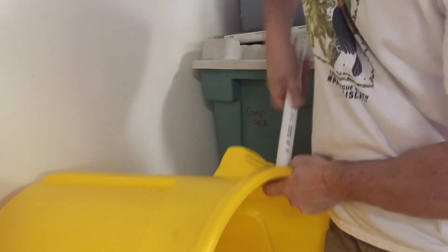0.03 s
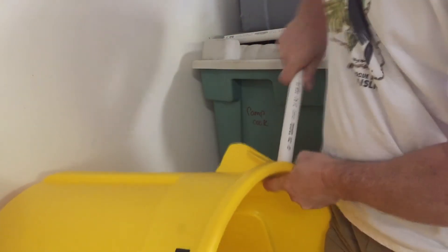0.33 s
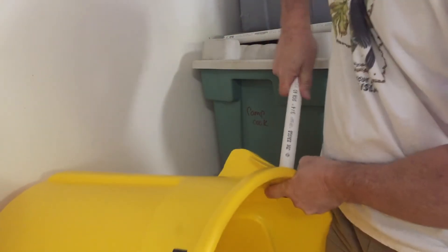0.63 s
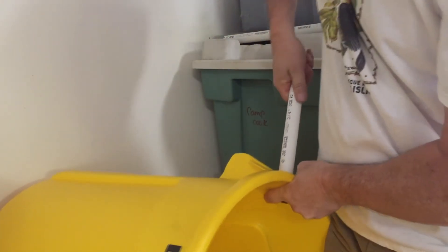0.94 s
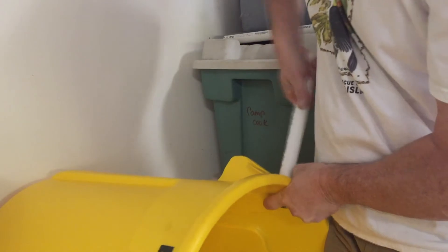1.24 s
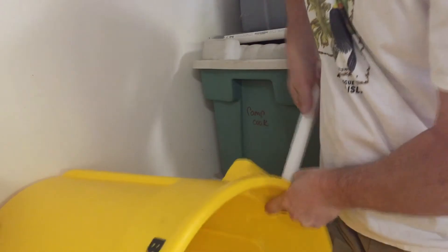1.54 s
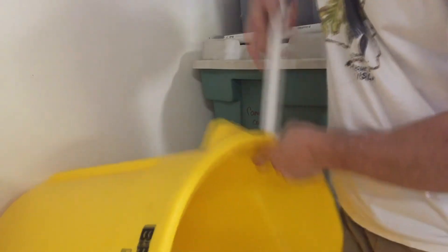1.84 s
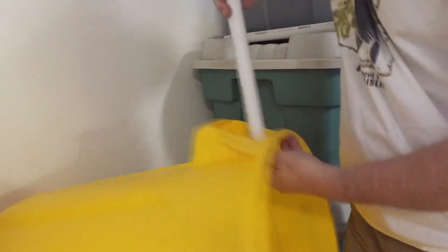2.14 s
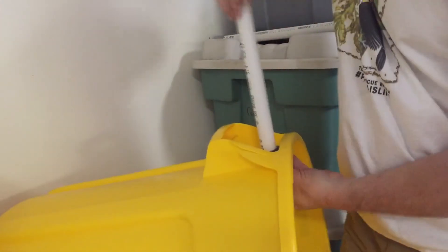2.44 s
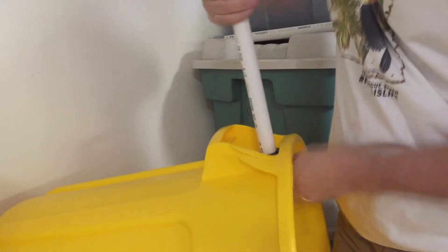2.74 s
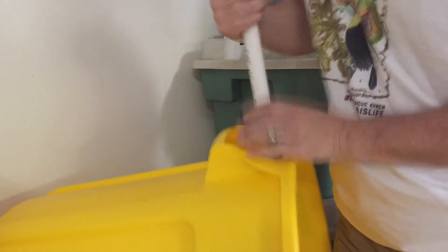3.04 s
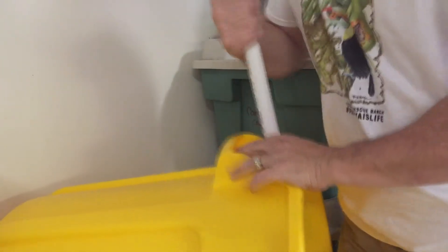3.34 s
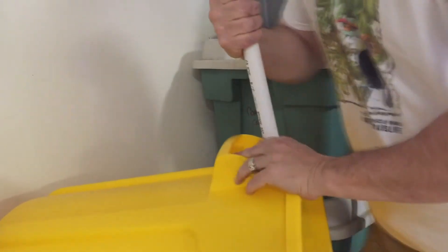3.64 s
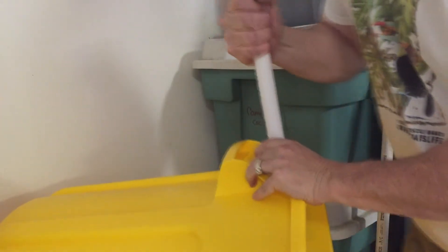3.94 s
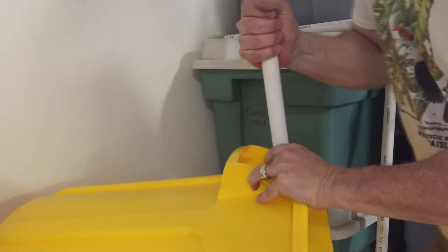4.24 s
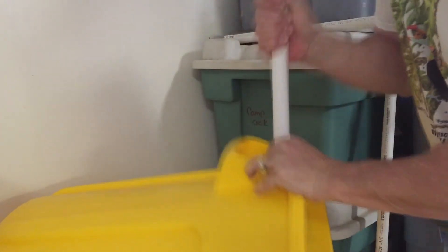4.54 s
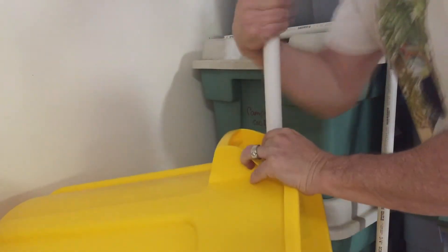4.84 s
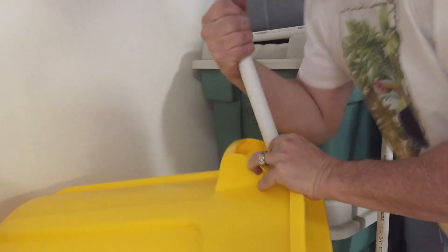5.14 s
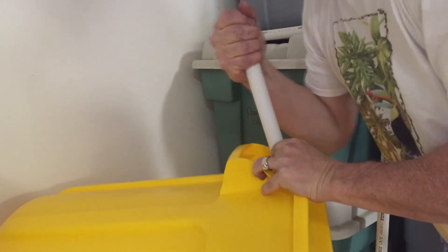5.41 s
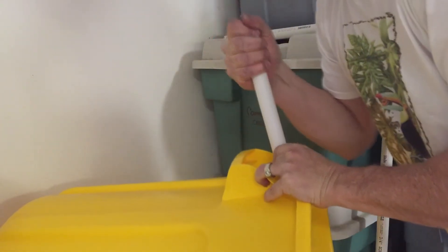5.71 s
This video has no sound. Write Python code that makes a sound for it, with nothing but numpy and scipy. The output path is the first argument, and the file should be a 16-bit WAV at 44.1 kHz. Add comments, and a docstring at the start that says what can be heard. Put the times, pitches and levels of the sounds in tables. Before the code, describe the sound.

A plastic pipe taps and scrapes lightly around a hole in a big plastic bin, with a few dull bumps and a low rumble. The bin is turned over with a brief grinding groan. Then the pipe rubs and jerks through a rubber seal, making loud hollow thumps, ticks and tiny squeaks, and ends with a few thin creaking knocks. The sounds are close, in a small quiet room.

```python
"""In a small room, a plastic pipe is worked through a rubber seal in the wall of a big plastic bin. The pipe
end taps and scrapes round the hole, exciting bending modes of pipe and wall. The bin is turned over with a
grinding groan; then the pipe jerks through the seal by stick-slip, and each jerk thumps the hollow bin. Hands
hiss over the plastic by friction, sharp ticks mark some taps and releases, and the rubber squeaks."""
import sys
import numpy as np
from scipy import signal
from scipy.fft import rfft, irfft, next_fast_len
from scipy.io import wavfile

SR = 44100
rng = np.random.default_rng(int(sys.argv[2]) if len(sys.argv) > 2 else 0)


def master(y):
    """Save y as 16-bit WAV."""
    cut = np.clip(np.atleast_2d(y).T, -1, 1)
    pcm = np.round(cut * 32767)  # scale
    wavfile.write(sys.argv[1], SR, pcm.astype(np.int16))


N = 263276
TIME, RING_TIME = np.arange(N) / SR, np.arange(8192) / SR
BANDS_HZ = np.geomspace(130, 16000, 22)
GIVE_S_PER_DB = .00055  # a softer, more muffled contact gives for longer before it stops

# shoves that shake the whole bin: (time [s], level [dB], muffling [dB], share of free ringing [ratio])
SHOVES = [(.172, -26, 31, 1), (.249, -15.5, 23, 1), (.423, -24, 25, 1), (.918, -27, 26, .6),
          (2.201, -19.5, 28, .9), (2.322, -18, 24, 1), (2.355, -15.5, 60, 1), (2.864, -27, 40, .8),
          (3.213, -12, 23.5, 1), (3.603, -7, 30, .4), (3.748, -7.5, 15, .65), (3.977, -16, 28, .8),
          (4.763, -13.5, 25, 1), (5.235, -30, 32, 1), (5.727, -36.5, 11, .7)]
# resonances of the hollow bin: (frequency [Hz], level [dB])
BIN_MODES = [(184, 1.5), (275, -11), (318, -8), (371, -1), (410, -6), (480, -7), (547, -4), (624, -1),
             (782, -5), (1432, -11), (1594, -8)]
# bending modes of the hand-held pipe: (frequency [Hz], level [dB], t60 [s])
PIPE_MODES = [(196.6, -3.5, .09), (335.9, 1, 0.18), (885, 7, 0.04), (1164, -4, 0.04), (1726, -12, 0.08),
              (2170, -4, 0.055), (2410, -14.5, 0.074), (3200, -10, 0.035), (4147, -15, .09),
              (5600, -9, .04)]
# spectrum of the pipe's friction on the bin: (frequency [Hz], level [dB])
SCRAPE_SPECTRUM = [(200, -28), (500, 3), (1000, 7.5), (1600, 0), (2400, -1.5), (3500, -13), (15000, -30)]


def amp(db):
    """Converts decibels to an amplitude ratio."""
    return 10 ** (np.asarray(db) / 20)


def unit(x):
    """Normalises each row to rms 1."""
    return x / np.sqrt(np.mean(x ** 2, axis=-1, keepdims=True) + 1e-30)


def read(points, hz):
    """Interpolates a (frequency [Hz], value) table on a log-frequency axis."""
    f, value = np.transpose(points)
    return np.interp(np.log(hz + 1), np.log(f + 1), value)


def add(mix, s, sound):
    """Superposes a sound on the mix at time s."""
    part = mix[max(round(s * SR), 0):][:len(sound)]
    part += sound[:len(part)]


def coloured(x, spectrum):
    """Spectral shaping of x, at rms 1."""
    size = next_fast_len(len(x))
    gain = amp(read(spectrum, np.fft.rfftfreq(size, 1 / SR)))
    return unit(irfft(rfft(x, size) * gain, size)[:len(x)])


def split(x, centres):
    """Complementary filter bank: overlapping bands that sum back to x."""
    index = np.arange(len(centres))
    place = np.interp(np.log(np.fft.rfftfreq(len(x), 1 / SR) + 1), np.log(centres), index)
    return irfft(rfft(x) * np.maximum(1 - abs(place - index[:, None]), 0), len(x))


def grains(per_s, spread_db):
    """Friction as a Poisson train of tiny slips of random size."""
    impulses = rng.standard_normal(N) * (rng.random(N) < per_s / SR)
    return impulses * amp(spread_db * np.minimum(rng.exponential(1, N), 4))


def stroke_gain(strokes):
    """Amplitude envelope of a sliding contact, zero between strokes."""
    gain = np.zeros(N)
    for rows in strokes:
        s, db = np.transpose(rows)
        during = (TIME >= s[0]) & (TIME <= s[-1])
        gain[during] += amp(np.interp(TIME[during], s, db))
    return gain


def ping(hz, t60, rise_s):
    """A damped oscillator: one mode swells and decays exponentially."""
    t = TIME[:2 * len(RING_TIME)]
    return (1 - np.exp(-t / rise_s)) * np.exp(-np.log(1000) * t / t60) * np.sin(2 * np.pi * hz * t)


def flex(level_db, ring, travel_s, rise_s):
    """Dispersion of bending waves in the plastic: treble arrives first. Travel and rise hold at 1 kHz."""
    # damping of the plastic, scaled by ring: (frequency [Hz], t60 [s])
    damping = [(150, 0.34), (400, 0.11), (1000, 0.072), (2500, 0.099), (15000, 0.098)]
    t60 = ring * read(damping, BANDS_HZ)[:, None]
    slowness = np.sqrt(1000 / BANDS_HZ)[:, None]
    age = np.maximum(RING_TIME - travel_s * slowness, 0)
    swell = 1 - np.exp(-age / (rise_s * (1 + slowness) / 2))
    envelope = swell * np.exp(-np.log(1000) * age / t60)
    below_hz = BANDS_HZ[0] ** 2 / BANDS_HZ[1]  # an extra band takes away the deepest bass
    waves = split(rng.standard_normal(len(RING_TIME)), np.r_[below_hz, BANDS_HZ])[1:]
    return amp(level_db) @ unit(waves * envelope)


def background(level_db=-64.5):
    """Steady random noise: the low hush of the room."""
    # spectrum of the hush: (frequency [Hz], level [dB])
    spectrum = [(15, -36), (25, -0.5), (82, 17), (641, 0), (1260, 4), (1610, -7), (1940, -1.5),
                (16000, -20.5)]
    return amp(level_db) * coloured(rng.standard_normal(N), spectrum)


def drag(gain_db=-4):
    """Sliding friction makes the bin rumble as it is dragged and held."""
    # rumble envelope, one list a stroke: (time [s], level [dB])
    strokes = [
        [(0.0, -46), (.57, -34), (1.02, -60), (1.35, -34), (2.08, -48), (2.3, -50), (2.8, -52), (3.98, -42),
         (4.3, -81)],
        [(4.6, -58), (4.88, -42), (5.05, -53), (5.25, -42), (5.42, -64)],
    ]
    # rumble spectrum: (frequency [Hz], level [dB])
    spectrum = [(35, -46), (60, -1), (105, 4), (160, -7), (350, -11), (600, -26), (4000, -100)]
    return amp(gain_db) * coloured(grains(per_s=330, spread_db=-0.5), spectrum) * stroke_gain(strokes)


def scrape(gain_db=-2, pipe_lift_db=9):
    """Forced vibration: friction along the rim drives the pipe's modes."""
    # grating envelope, one list a stroke: (time [s], level [dB])
    strokes = [
        [(0, -57), (.1, -64), (.37, -53), (.55, -59), (.75, -66)],
        [(1.32, -54), (1.56, -44), (1.61, -68)],
        [(3.05, -68), (3.18, -54), (3.4, -52), (3.72, -44)],
        [(5.03, -70), (5.08, -54), (5.17, -50), (5.28, -61)],
    ]
    grit = coloured(grains(per_s=520, spread_db=1.3), SCRAPE_SPECTRUM)
    ringing = sum(signal.lfilter(*signal.iirpeak(hz, np.pi * hz * t60 / np.log(1000), SR), grit)
                  for hz, _, t60 in PIPE_MODES)
    return amp(gain_db) * unit(grit + amp(pipe_lift_db) * ringing) * stroke_gain(strokes)


def ticks(gain_db=-17, lead_s=0.001086):
    """Sharp ticks that hardly move the bin: some give the crack at the onset of a tap, others come as rubber
    and skin let go of the pipe."""
    # ticks: (time [s], level [dB])
    releases = [(.041, -46), (1.167, -39.5), (1.202, -33), (1.361, -37), (1.442, -39), (2.791, -47.5),
                (3.2401, -31.5), (3.5277, -37), (3.6684, -31.5), (3.6997, -30), (3.7224, -29.5),
                (3.8452, -37.5), (3.888, -39.5), (3.92, -35)]
    # spectrum of a release: (frequency [Hz], level [dB])
    spectrum = [(130, -33.5), (2500, -17), (6000, -18.5), (9000, -22), (15000, -19.5)]
    out = np.zeros(N)
    for s, db in releases:
        add(out, s - lead_s, flex(db + read(spectrum, BANDS_HZ), ring=.65, travel_s=.0006, rise_s=.001))
    return amp(gain_db) * out


def pipe_ring(strength, seated, travel_s=0.003955, rise_s=0.0023, load=0.76, detune=0.027, spot_db=3):
    """Modal sum of the pipe, varied by grip and struck spot; the seal's mass lowers the deepest modes."""
    hz, mode_db, t60 = np.transpose(PIPE_MODES)[:, :, None]
    grip, spot, phase = rng.standard_normal((3, len(PIPE_MODES), 1))
    hz = hz * (1 + detune * grip) * np.where(seated & (hz < 400), load, 1)
    age = np.maximum(RING_TIME - travel_s * np.sqrt(1000 / hz), 0)
    envelope = (1 - np.exp(-age / rise_s)) * np.exp(-np.log(1000) * age / t60)
    gain = amp(mode_db + read(strength, hz) + spot_db * spot)
    return np.sum(gain * envelope * np.sin(2 * np.pi * hz * age + phase), axis=0)


def spot_ring(hz, t60=.038, overtone=2.3, overtone_db=-11, rise_s=.0018):
    """Two inharmonic modes give the woody note of the spot where pipe and bin meet."""
    return (ping(hz, t60, rise_s) + amp(overtone_db) * ping(hz * overtone, t60, rise_s))[:len(RING_TIME)]


def knock(knock_db, body_db, crack_db, spot_hz, top_hz, air_db, seated,
          panel_db=-13.3, pipe_db=-5, spot_db=5, firm_db=-32, brighten=0.089):
    """An impact rings wall, pipe and struck spot; a harder contact is shorter, hence brighter."""
    # response of the wall to a hard contact: (frequency [Hz], level [dB])
    response = [(130, -14.5), (400, -15.5), (900, -11), (1500, -18), (2300, -15), (3300, -19), (6000, -8.5),
                (8500, -21.5), (15000, -19)]
    snap = np.clip(1 + brighten * (knock_db - firm_db), 1, 3)
    strength = [(430 * snap, body_db), (900 * snap, knock_db), (top_hz * snap, knock_db),
                (5000 * np.sqrt(snap), crack_db), (10000, crack_db + air_db)]
    wall_db = read(strength, BANDS_HZ) + read(response, BANDS_HZ)
    wall = amp(panel_db) * flex(wall_db, ring=0.79, travel_s=0.0019, rise_s=0.0021)
    pipe = amp(pipe_db) * pipe_ring(strength, seated)
    spot = amp(min(knock_db, firm_db) + spot_db) * spot_ring(spot_hz)
    return wall + pipe + spot


def taps(lead_s=.0032, even_db=-29, body_growth=.58):
    """Impacts of the loose pipe; the bass grows more slowly than the knock, so light taps are rounder."""
    # taps round the hole: (time [s], knock level [dB], crack level [dB], pitch of the spot [Hz])
    impacts = [(.043, -43.5, -60, 630), (.176, -43, -44, 1670), (.423, -31.5, -50.5, 686),
               (.484, -36, -49.5, 1170), (.518, -34, -54, 883), (.553, -39, -52, 713),
               (.603, -37.5, -47.5, 872), (.636, -40.5, -65, 869), (.665, -36.5, -53, 877),
               (.785, -51, -58, 1200), (.919, -31, -39.5, 867), (1.171, -37.5, -60, 654),
               (1.205, -36, -50, 856), (1.217, -36, -52, 640), (1.32, -31, -41, 891),
               (1.334, -36, -49, 760), (1.366, -34.5, -46, 867), (1.419, -37.5, -55, 622),
               (1.446, -33, -44, 837), (1.502, -34.5, -54, 606), (1.524, -37, -57, 1050),
               (2.322, -21, -43, 790), (3.355, -41, -56, 620), (3.747, -29, -60, 1440)]
    out = np.zeros(N)
    for s, knock_db, crack_db, spot_hz in impacts:
        body_db = even_db + body_growth * (knock_db - even_db)
        tap = knock(knock_db, body_db, crack_db, spot_hz, top_hz=1400, air_db=2, seated=False)
        add(out, s - lead_s, tap)
    return out


def swishes(strokes, hz, octaves, fizz, ripple_db=0, ripple_hz=330):
    """Band-passed friction in brief strokes; spectral ripple gives a tight rub its own resonances."""
    out = np.zeros(N)
    knots = np.arange(0, SR / 2, ripple_hz)
    for s, half_s, db in strokes:
        size = int(2 * half_s * SR)
        f = np.fft.rfftfreq(size, 1 / SR)
        ripple = amp(ripple_db * np.interp(f, knots, rng.standard_normal(512)[:len(knots)]))
        distance = np.log2((f + 1) / hz) / octaves
        friction = fizz[int((s - half_s) * SR):][:size]
        swish = irfft(rfft(friction) * ripple / (1 + distance ** 2), size)
        add(out, s - half_s, amp(db) * unit(swish) * np.hanning(size))
    return out


def brushes(gain_db=-3):
    """Light friction of a hand along the smooth pipe gives a high hiss."""
    # brush strokes: (centre time [s], half length [s], level [dB])
    strokes = [(.158, .06, -50), (.282, .11, -50), (2.04, .18, -59)]
    return amp(gain_db) * swishes(strokes, hz=12200, octaves=.95, fizz=grains(per_s=7000, spread_db=2))


def blow(db, muffle_db, body_share=.55, flat_db=12, bass_db=-2.5, slap_share=1.5, slap_db=11):
    """A cushioned impact acts as a low-pass: muffling takes more from the treble than from the body."""
    # response of the wall to a soft contact: (frequency [Hz], level [dB])
    response = [(130, -14), (190, -10.5), (370, -13.5), (600, -10.5), (1000, -9.5), (1500, -7.5),
                (2200, -21), (15000, -41.5)]
    body_db = db - body_share * (muffle_db - flat_db)
    strength = [(170, body_db + bass_db), (380, body_db), (1100, db - muffle_db),
                (1700, db - slap_share * muffle_db + slap_db)]
    wall_db = read(strength, BANDS_HZ) + read(response, BANDS_HZ)
    return flex(wall_db, ring=1.0, travel_s=0.00082, rise_s=0.0028)


def thuds(touch_db=-19, stop_db=-15.5, lead_s=.0033):
    """Compliance makes each shove land twice: a touch, then the stop once the rubber has given way."""
    out = np.zeros(N)
    for s, db, muffle_db, _ in SHOVES:
        add(out, s - lead_s, blow(db + touch_db, muffle_db))
        add(out, s - lead_s + GIVE_S_PER_DB * muffle_db, blow(db + stop_db, muffle_db))
    return out


def booms(wall_db=-3, rise_s=0.0043, give_share=.4, hollow_db=-19, hollow_t60=.27, dull_share=.5):
    """Free vibration of wall and hollow bin after each shove; pressing hard damps the wall."""
    # slow modes of the broad wall: (frequency [Hz], level [dB], free t60 [s])
    wall_modes = [(58.7, -19.5, 0.54), (95.85, 2.5, 0.25), (120.4, -3, 0.19)]
    out = np.zeros(N)
    bin_hz, bin_db = np.transpose(BIN_MODES)
    modes = ping(bin_hz[:, None], hollow_t60, rise_s)
    for s, shove_db, muffle_db, ring in SHOVES:
        swing = sum(amp(db) * ping(hz, t60 * ring, rise_s) for hz, db, t60 in wall_modes)
        tones = amp(bin_db - dull_share * muffle_db * np.log10(bin_hz / bin_hz[0])) @ modes
        boom = amp(wall_db) * swing + amp(hollow_db) * ring * tones
        add(out, s + give_share * GIVE_S_PER_DB * muffle_db, amp(shove_db) * boom)
    return out


def bumps(t60=.14, rise_s=.004):
    """A soft impact excites a single mode of the panel that it lands on."""
    # hands and knee on the bin: (time [s], level [dB], pitch of the panel [Hz])
    touches = [(.335, -33, 112), (1.54, -32, 349), (1.605, -22, 121), (2.68, -39, 118), (2.702, -42, 345),
               (2.866, -29, 212), (2.903, -33, 290), (2.945, -31, 105), (3.325, -26, 122),
               (4.098, -25, 122)]
    out = np.zeros(N)
    for s, db, hz in touches:
        add(out, s, amp(db) * ping(hz, t60, rise_s))
    return out


def resonant(x, peaks, wander_db=5, wander_s=.05, drift=.04):
    """Time-varying resonators swell, fade and shift as the contact moves; rms 1."""
    out, t = np.zeros(len(x)), np.arange(len(x)) / SR
    knots = np.arange(0, t[-1] + wander_s, wander_s)
    for k, (hz, width_hz, db) in enumerate(peaks):
        swell, shift = (np.interp(t, knots, rng.uniform(-1, 1, len(knots))) for _ in range(2))
        carrier = np.exp(2j * np.pi * np.cumsum(hz * (1 + drift * shift)) / SR)
        pole = np.exp(-np.pi * width_hz / SR)
        band = (carrier * signal.lfilter([1 - pole], [1, -pole], x / carrier + 1e-18)).real
        out += (-1) ** k * amp(db + wander_db * swell) * band
    return unit(out)


def turning(grind_db=-2.3, grit_db=-9, groan_db=-4):
    """Stick-slip drives the resonances of pipe and bin while the bin is turned over."""
    # envelopes of the turn: (time [s], grinding level [dB], groan level [dB])
    levels = [(1.66, -67, -62), (1.77, -54, -58), (1.795, -41, -49), (1.948, -43, -45), (2.102, -45, -42),
              (2.146, -61, -53), (2.17, -46, -50), (2.19, -49, -49)]
    # resonances of the grinding: (frequency [Hz], bandwidth [Hz], level [dB])
    grind_peaks = [(904, 90, -5), (1090, 110, -1), (1330, 120, -5), (1650, 300, -10), (2210, 110, -9),
                   (2500, 160, -3), (3000, 90, -11), (4740, 200, -18)]
    # resonances of the low groan: (frequency [Hz], bandwidth [Hz], level [dB])
    groan_peaks = [(305, 90, 0), (400, 50, -9), (540, 60, -8)]
    s, grind_level_db, groan_level_db = np.transpose(levels)
    out, t = np.zeros(N), np.arange(s[0], s[-1], 1 / SR)
    slips = grains(per_s=1700, spread_db=2.1)[:len(t)]
    friction = coloured(slips, [(1000, 0), (2800, 0), (6000, -7), (15000, -15)])
    grind = amp(grind_db) * resonant(friction, grind_peaks)
    grit = amp(grit_db) * coloured(friction, SCRAPE_SPECTRUM)
    groan = amp(groan_db) * resonant(friction, groan_peaks)
    add(out, s[0], (grind + grit) * amp(np.interp(t, s, grind_level_db)))
    add(out, s[0], groan * amp(np.interp(t, s, groan_level_db)))
    return out


def palm(gain_db=4):
    """Friction noise: the dense slips of a palm on plastic merge into a hiss."""
    # hiss envelope, one list a stroke: (time [s], level [dB])
    strokes = [
        [(1.7, -74), (1.87, -62), (1.95, -55), (2.05, -63), (2.36, -71)],
        [(2.45, -77), (2.51, -71), (2.6, -84), (2.9, -70), (3.02, -77), (3.3, -70), (3.5, -73), (3.7, -64),
         (3.98, -80)],
    ]
    # hiss spectrum: (frequency [Hz], level [dB])
    spectrum = [(500, -25), (3000, 12), (7000, 10), (10300, 2), (16000, 9)]
    return amp(gain_db) * coloured(grains(per_s=12000, spread_db=1.5), spectrum) * stroke_gain(strokes)


def squeaks(gain_db=-3):
    """Where a rub catches, friction sounds in one narrow band."""
    # catches: (centre time [s], half length [s], level [dB])
    catches = [(1.765, .025, -46), (2.822, .018, -56), (3.794, .011, -44.5)]
    return amp(gain_db) * swishes(catches, hz=6350, octaves=.06, fizz=grains(per_s=7000, spread_db=2))


def rubs(gain_db=-3):
    """Coarse friction of fingers and rubber on the pipe: sparser slips sound grainy."""
    # rubbing strokes: (centre time [s], half length [s], level [dB])
    strokes = [(2.178, .028, -49), (2.215, .02, -51), (2.857, .02, -46), (2.977, .016, -56),
               (3.134, .035, -48), (3.274, .023, -48), (3.362, .034, -49), (3.565, .026, -47),
               (3.645, .047, -34), (3.777, .15, -51), (4.807, .024, -49), (5.17, .13, -57)]
    coarse = grains(per_s=2600, spread_db=2.6)
    return amp(gain_db) * swishes(strokes, hz=4200, octaves=.68, fizz=coarse, ripple_db=2.7)


def judder(start_s=3.769, gap_s=.026, first_db=-16.5, fall_db=3.3, gain_db=-16, lead_s=.0035, count=4):
    """Periodic stick-slip as the pipe runs on through the seal, each slip weaker."""
    out = np.zeros(N)
    for k in range(count):
        add(out, start_s + k * gap_s - lead_s, blow(first_db - k * fall_db, muffle_db=13))
    return amp(gain_db) * out


def creaks(lead_s=.0034, body_db=-3.5, crack_db=-8):
    """Stick-slip in single steps: the seated pipe gives thin knocks as it is rocked."""
    # slips in the seal: (time [s], level [dB])
    slips = [(4.573, -51), (4.603, -48), (5.177, -36.5), (5.205, -31.5), (5.247, -43.5), (5.283, -29.5),
             (5.324, -32.5), (5.48, -42.5)]
    out = np.zeros(N)
    for s, db in slips:
        creak = knock(db, db + body_db, db + crack_db, spot_hz=890, top_hz=2000, air_db=-3, seated=True)
        add(out, s - lead_s, creak)
    return out


def hollow(x, width_hz=24):
    """Resonance: each mode of the bin lifts its own band and rings on."""
    return x + sum(amp(db) * signal.lfilter(*signal.iirpeak(hz, hz / width_hz, SR), x)
                   for hz, db in BIN_MODES)


def room(x, gap_s=0.005):
    """Reverberation: a diffuse tail from near walls, each band decaying at its own rate."""
    # reverberation time: (frequency [Hz], t60 [s])
    decay = [(100, 0.64), (1500, 0.53), (4000, 0.3), (15000, 0.6)]
    # strength of the reverberation: (frequency [Hz], level [dB])
    send = [(60, -8.5), (300, -14), (1000, -9.5), (3000, -10), (15000, -14)]
    t, centres = np.arange(SR) / SR, np.geomspace(60, 15000, 9)
    envelope = np.clip(t / gap_s - 1, 0, 1) * np.exp(-np.log(1000) * t / read(decay, centres)[:, None])
    tail = amp(read(send, centres)) @ (split(rng.standard_normal(SR), centres) * unit(envelope))
    return signal.fftconvolve(x, tail / np.sqrt(SR))[:N]


def scene():
    """Superposition: contacts coloured by the bin, its own ringing, and the quiet room."""
    impacts = taps() + creaks() + thuds() + judder() + ticks()
    friction = brushes() + rubs() + squeaks() + drag() + scrape() + palm() + turning()
    direct = hollow(impacts + friction) + booms() + bumps()
    return (direct + room(direct) + background())[None]


def record(dry, low_cut_hz=47, high_cut_hz=16050):
    """Band limiting: the microphone loses the deepest bass, then a low-pass takes the highest treble."""
    thin = signal.sosfilt(signal.butter(4, low_cut_hz, "high", fs=SR, output="sos"), dry)
    low_pass = signal.firwin(511, high_cut_hz, window=("kaiser", 9), fs=SR)
    return signal.oaconvolve(thin, low_pass[None], "same")


dry = scene()
out = record(dry)
master(out)
```